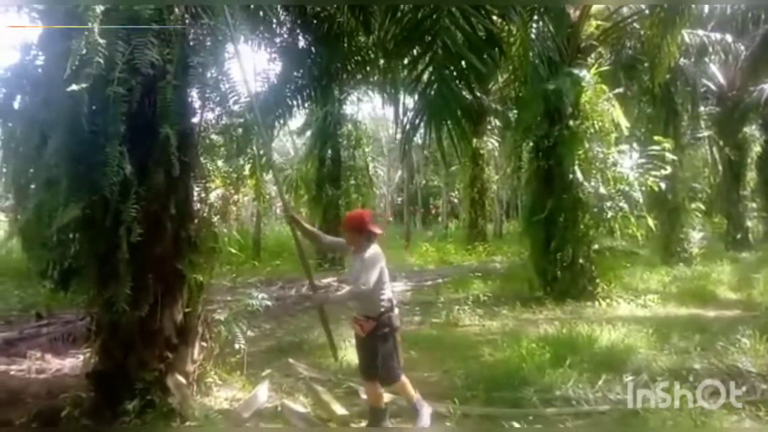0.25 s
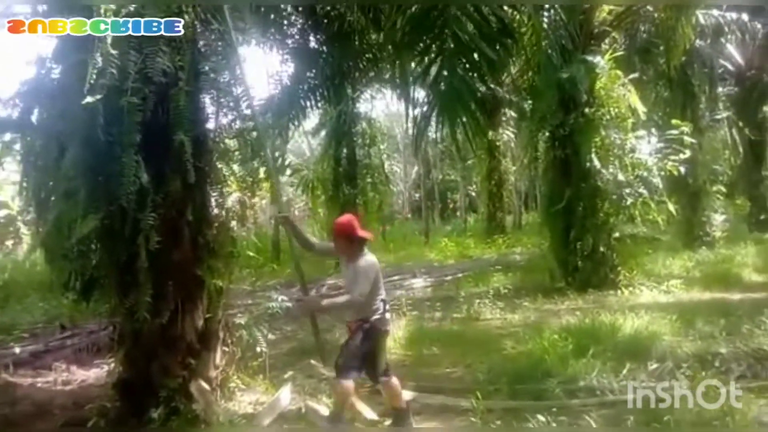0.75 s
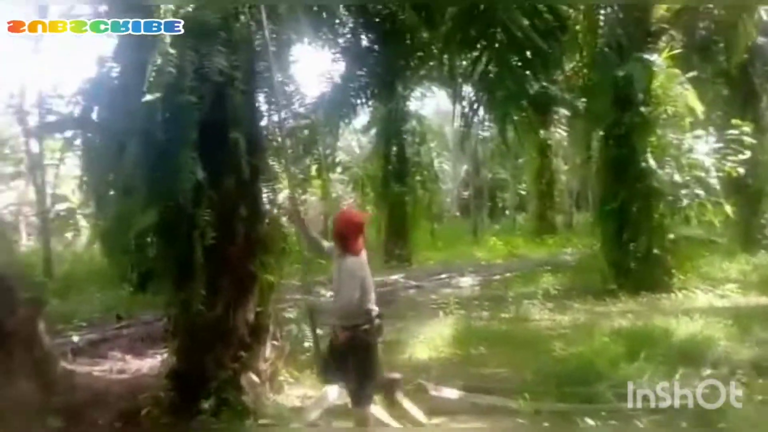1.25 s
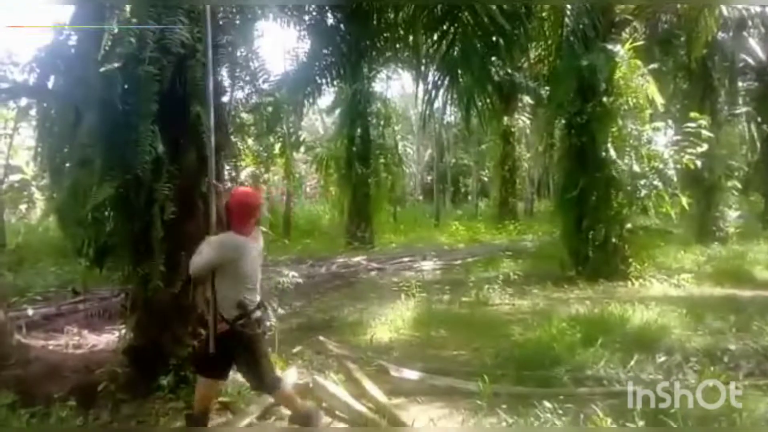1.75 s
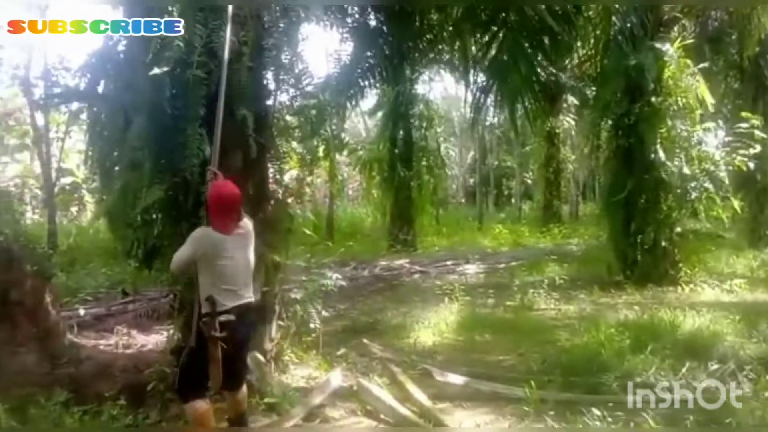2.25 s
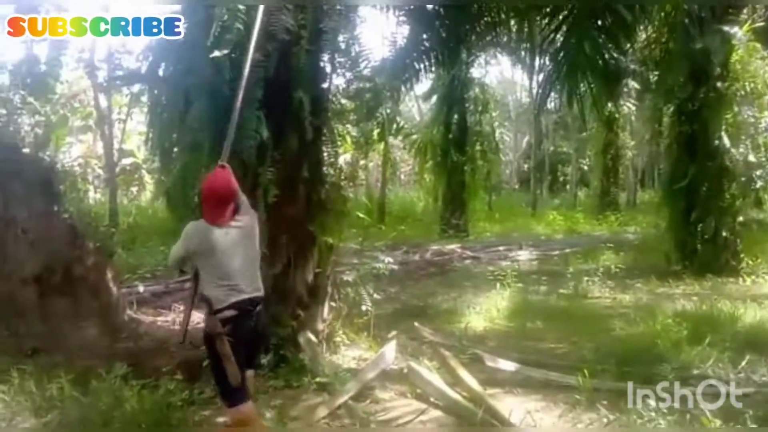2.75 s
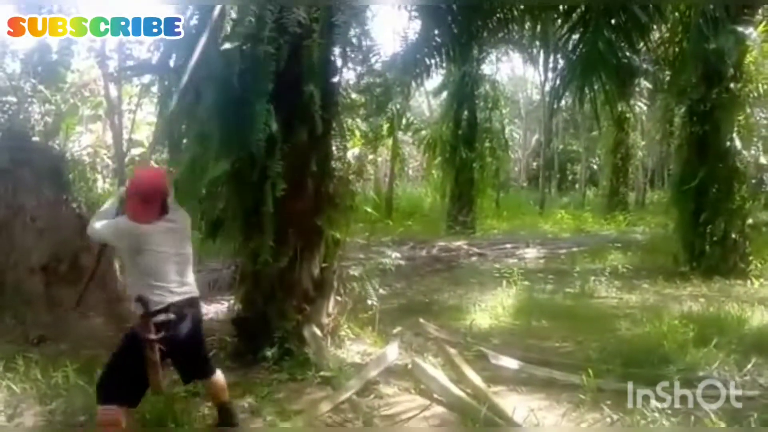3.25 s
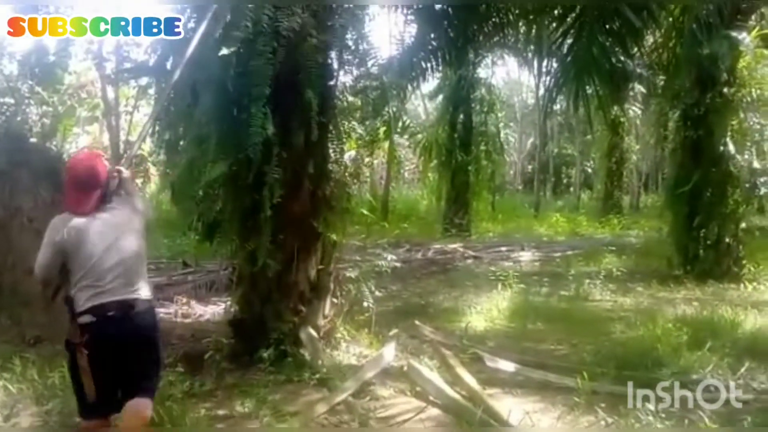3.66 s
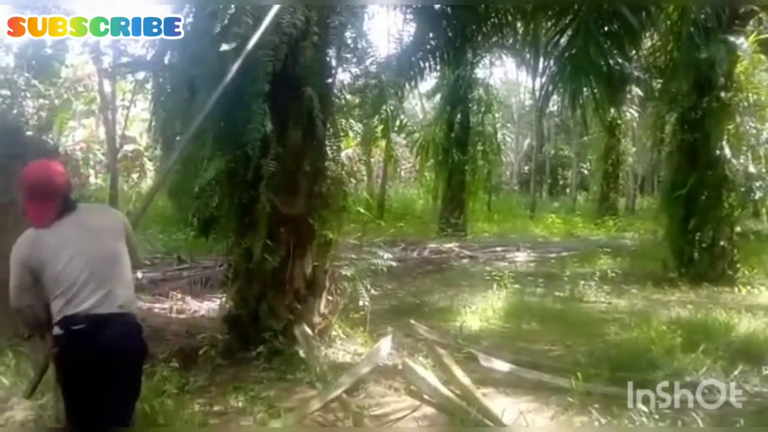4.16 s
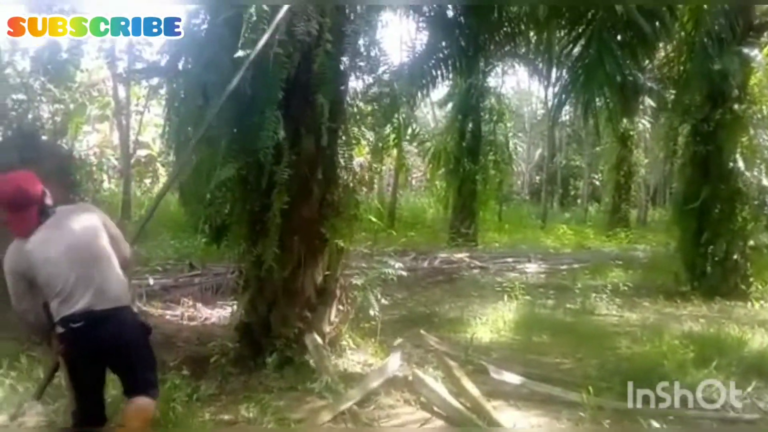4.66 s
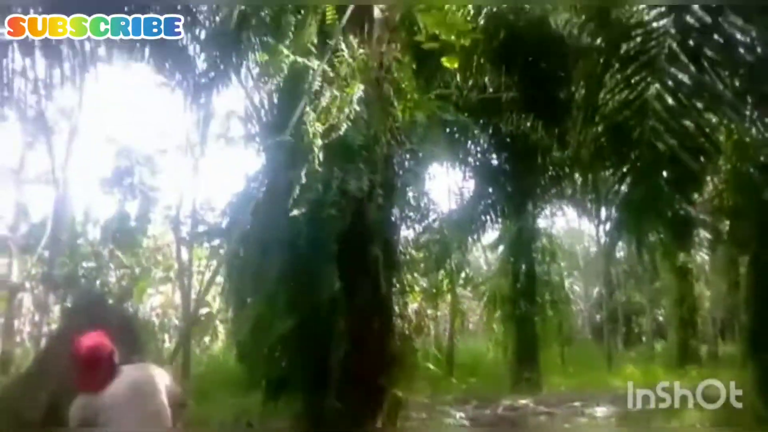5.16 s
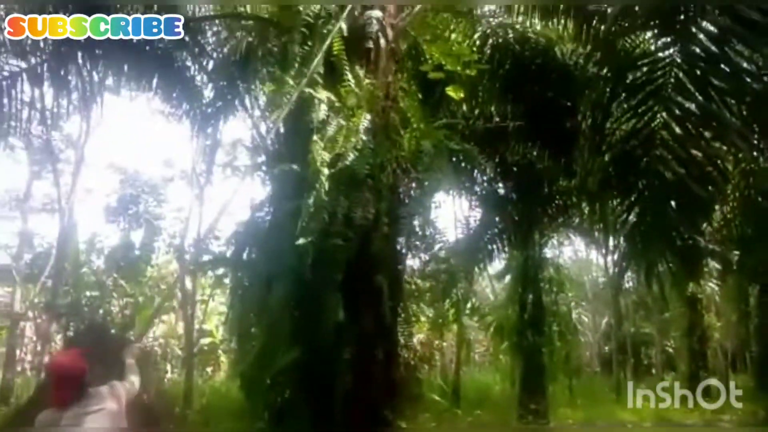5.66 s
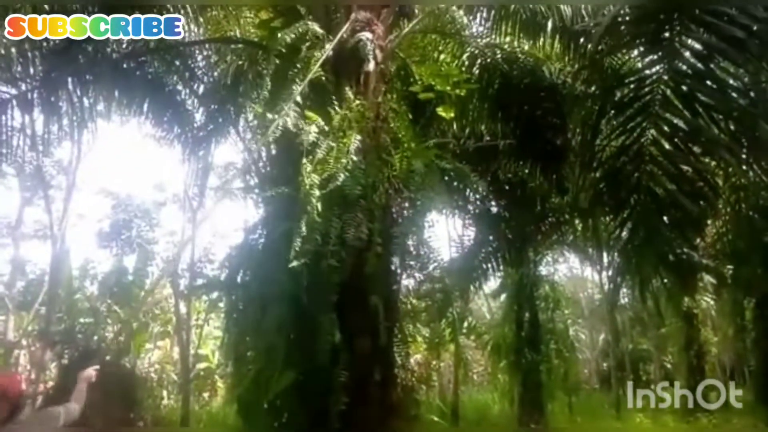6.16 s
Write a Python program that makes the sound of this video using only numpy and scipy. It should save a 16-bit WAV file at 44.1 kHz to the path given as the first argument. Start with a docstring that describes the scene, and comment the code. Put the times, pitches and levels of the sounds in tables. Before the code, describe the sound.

Hollow pole knocks and sharp cracks lead to a tearing cut, then a heavy frond clatters down amid rushing leaves, pattering bits and shrill insects.

```python
"""An oil palm plantation, heard from one point: a harvester works a sickle on a long metal pole in a crown.
Noise bursts knock along the pole and resonators ring; short bright bursts are a stalk cracking and the
hard edge of blows. Dense noise contacts rasp as the blade cuts, and looser ones, through many small
resonances, make the frond crash in a rush of leaflets; decaying tones are bits pattering from the start
of the crash and after it. Filtered noise gives the steady shrill of insects and the soft stir of air."""
import sys
import numpy as np
from scipy import signal
from scipy.fft import rfft, irfft
from scipy.io import wavfile
from scipy.ndimage import uniform_filter1d

SR = 44100
rng = np.random.default_rng(int(sys.argv[2]) if len(sys.argv) > 2 else 0)


def bounce(signal):
    """Save signal as a 16-bit WAV file at the path given by the first command-line argument."""
    frames = np.transpose(np.atleast_2d(signal))
    limited = np.clip(frames, -1, 1)
    pcm = np.round(limited * 32767).astype(np.int16)
    wavfile.write(sys.argv[1], SR, pcm)


N = 282681
TIME = np.arange(N) / SR

# Modes of the metal tube: pitch_hz, level_db, t60_s (when held loosely)
TUBE_MODES = [(459, -10.5, 0.21), (640, 0, 0.11), (677.4, 3.5, 0.21), (798, 3, 0.16), (1021, -9.5, 0.11),
              (1122, -3, 0.18), (1230, -15, 0.09), (1570, -9, 0.17), (2530, -14, 0.19)]


def from_db(db):
    """Decibels to gain."""
    return 10 ** (np.asarray(db) / 20)


def rms_one(x):
    """Scale to unit power."""
    return x / np.sqrt(np.mean(x ** 2) + 1e-20)


def drift(rate_hz):
    """Slow random wander of spread 1, joining rate_hz random points a second with straight lines."""
    points = rng.standard_normal(2000)
    return rms_one(np.interp(TIME * rate_hz, np.arange(2000), points))


def swells(rows):
    """Summed power of smooth, bell-shaped movements."""
    return sum(from_db(db) ** 2 * np.exp(-((TIME - s) / half_s) ** 2) for s, db, half_s in rows)


def colour(x, spectrum, size=4096):
    """Causal (minimum-phase) filter with the given spectrum."""
    hz, db = np.transpose(spectrum)
    grid_hz = np.maximum(np.fft.rfftfreq(size, 1 / SR), 1)
    gain = from_db(np.interp(np.log(grid_hz), np.log(hz), db))
    cepstrum = irfft(np.log(gain))
    # folding the cepstrum onto positive times puts the energy as early as possible
    fold = 1 + np.sign(size / 2 - np.arange(size))
    fold[0] = 1
    impulse = irfft(np.exp(rfft(cepstrum * fold)))
    return signal.fftconvolve(x, impulse)[:len(x)]


def ring(x, modes):
    """Resonators; a unit click at 0 dB sets each ringing with height 1."""
    out = np.zeros(N)
    for hz, db, t60 in modes:
        radius = from_db(-60 / (t60 * SR))
        angle = 2 * np.pi * hz / SR
        poles = [1, -2 * radius * np.cos(angle), radius * radius]
        out += from_db(db) * signal.lfilter([.5, 0, -.5], poles, x + 1e-18)
    return out


def resonate(x, hz, db, t60):
    """Lift a sound at a body's mode, which rings on after it."""
    quality = max(hz * t60 * np.pi / np.log(1000), 1)
    return x + from_db(db) * signal.lfilter(*signal.iirpeak(hz, quality, fs=SR), x)


def burst(t60, click, size=16384):
    """A first contact, a fast crunch and a faint aftermath."""
    t = np.arange(size) / SR
    aftermath = from_db(-17 - 60 * t / .16)
    x = rng.standard_normal(size) * (from_db(-60 * t / t60) + aftermath)
    x[0] += click
    return x


def disperse(x, travel_s):
    """Bending waves travel with the root of frequency, so a blow arrives as a quick downward chirp."""
    hz = np.fft.rfftfreq(2 * len(x), 1 / SR)
    delay_s = travel_s * np.maximum(np.sqrt(1000 / np.maximum(hz, 60)) - .8, 0)
    phase = 2 * np.pi * np.cumsum(delay_s) * hz[1]
    return irfft(rfft(x, 2 * len(x)) * np.exp(-1j * phase))[:len(x)]


def add(out, s, db, sound, size=176):
    """Mix a sound in at time s with its loudest 4 ms at db."""
    i = int(s * SR)
    peak = np.sqrt(uniform_filter1d(sound ** 2, size, mode="constant").max())
    out[i:i + len(sound)] += (sound * from_db(db) / peak)[:N - i]


def grains(per_s, spread_db, smooth):
    """Random tiny contacts of uneven size over the blur of countless smaller ones."""
    sizes = from_db(spread_db * np.minimum(rng.exponential(1, N), 4)) * rng.choice([-1, 1], N)
    contacts = rms_one(sizes * (rng.random(N) < per_s / SR))
    return rms_one(contacts + smooth * rng.standard_normal(N))


def rustle(spectrum, per_s, patchy_db, smooth, count=36, cycles=24):
    """Contacts ring many short resonances spread across the spectrum; the level of each band wanders by itself,
    so the sound is patchy."""
    contacts = [grains(per_s, spread_db=3.0, smooth=smooth) for _ in range(3)]
    out = np.zeros(N)
    for k, hz in enumerate(np.geomspace(spectrum[0][0], spectrum[-1][0], count)):
        band = rms_one(ring(contacts[k % len(contacts)], [(hz, 0, cycles / hz)]))
        # wider bands at higher pitches carry more power
        out += np.sqrt(hz) * band * from_db(patchy_db * drift(28))
    return rms_one(colour(out, spectrum))


def plantation(insect_db=-59, air_db=-75):
    """A shrill insect chorus over a soft stir of air, both as filtered noise with a slight wander in level."""
    # Spectrum of the chorus: pitch_hz, gain_db
    insect_spectrum = [(3000, -30), (4200, -29), (5100, -18), (6500, -23), (7000, -12), (7450, 0.5),
                       (7900, -6), (8600, -10.5), (9100, -31.5), (14000, -79), (15200, -27.5)]
    # Spectrum of the stirring air: pitch_hz, gain_db
    air_spectrum = [(20, -24.5), (50, 8), (100, 10), (200, 0), (330, -1), (900, -23.5), (3000, -19),
                    (9000, -97)]
    chorus = rms_one(colour(rng.standard_normal(N), insect_spectrum))
    stir = rms_one(colour(rng.standard_normal(N), air_spectrum))
    return from_db(insect_db + 0.2 * drift(30)) * chorus + from_db(air_db + 0.49 * drift(5.5)) * stir


def settle(full_s, swell_s, hold_s, settling_s, damping):
    """Motion swells by 20 dB in swell_s up to full_s, holds, then dies fast at first and ever more slowly."""
    t = TIME - full_s
    swell = from_db(20 * np.minimum(t, 0) / swell_s)
    return swell * (1 + np.maximum(t - hold_s, 0) / settling_s) ** -damping


def foliage_motion(brush_stalk_db=-10.5, bump_db=-8, bump_growth=1.38):
    """Strength of leaflets, stalks and the frond's mass; the powers of all brushes and shakes add up."""
    # The pole brushes past leaflets: middle_s, level_db (before the leaflet trim), half_length_s
    brushes = [(0.09, -59, 0.19), (0.37, -55, 0.077), (0.54, -59, 0.063), (0.86, -64.5, 0.14),
               (1.1, -63, 0.11), (1.21, -58.5, 0.062), (1.6, -70.5, 0.11), (2.19, -60.5, 0.034),
               (5.07, -57, 0.15), (5.70, -50.5, 0.038)]
    # A frond gives way, falls or lands, then settles: full_s (the motion reaches full strength, after
    # its swell), leaflet_db (before the trims), weight_db (stalks over leaflets; also steers the bumps),
    # swell_s, hold_s, settling_s
    shakes = [(1.824, -47, -2.5, 0.026, 0.0074, 0.27), (2.534, -45.5, 1.5, .1, 0.0084, 0.42),
              (3.119, -44.5, 0, 0.32, 0.035, 0.045), (3.338, -48, -3.5, 0.96, 0.049, 3),
              (3.752, -45, 4, 0.12, 0.21, 0.88), (5.777, -53.5, 2, 0.047, .11, 0.24)]
    leaf_damping, stalk_damping, mass_damping = 3.2, 6.1, 4.9  # powers: heavy parts come to rest first
    leaf = swells(brushes)
    stalk, mass = leaf * from_db(brush_stalk_db) ** 2, 0
    for full_s, db, weight, *shape in shakes:
        mass_level_db = db + bump_db + bump_growth * weight
        leaf = leaf + (from_db(db) * settle(full_s, *shape, leaf_damping)) ** 2
        stalk = stalk + (from_db(db + weight) * settle(full_s, *shape, stalk_damping)) ** 2
        mass = mass + (from_db(mass_level_db) * settle(full_s, *shape, mass_damping)) ** 2
    return np.sqrt([leaf, stalk, mass])


def foliage(leaf_db=0.56, stalk_db=-2.5, mass_db=-5.0):
    """Leaflets brush, stalks clatter, and the weight of the frond bumps along beneath."""
    # Spectra of leaflets, stalks and the frond's mass: pitch_hz, gain_db
    leaflet_spectrum = [(900, -26.5), (2000, -6.5), (3300, -1.5), (5000, 1.5), (6600, 4), (8000, -9),
                        (10000, -17.5), (13600, -35), (15000, -14.5)]
    stalk_spectrum = [(200, -13.5), (420, -2.5), (800, -0.5), (1600, -3), (2600, -8), (5000, -16)]
    mass_spectrum = [(50, -21.5), (120, -7.5), (200, -3), (420, -7.5), (800, -35), (2000, -43)]
    leaf, stalk, mass = foliage_motion()
    jerks = from_db(drift(45))
    leaves = leaf * from_db(leaf_db) * rustle(leaflet_spectrum, per_s=650, patchy_db=3.0, smooth=0.8)
    clatter = stalk * from_db(stalk_db) * rustle(stalk_spectrum, per_s=170, patchy_db=4.0, smooth=0.35)
    bumps = mass * from_db(mass_db) * rustle(mass_spectrum, per_s=140, patchy_db=4.5, smooth=0.45)
    return jerks * (leaves + clatter + bumps)


def pole_knocks(travel_s=0.00697, ring_db=2, ring_t60=0.032):
    """Hollow knocks that have run the length of the pole; each has a note, and little sound far above it."""
    # Blows that run down the pole: start_s, level_db (loudest 4 ms),
    # bass_db and treble_db (offsets that shape the spectrum), t60_s (of the crunch), pitch_hz
    blows = [(0.1, -50, -18, -4, 0.43, 1630), (0.141, -40.5, -11.5, -6, 0.066, 2100),
             (0.149, -36.5, -11.5, -8, 0.084, 1040), (0.581, -60, -25, -8, 0.19, 1530),
             (1.31, -43.5, 2, -16, 0.063, 776), (2.618, -42.5, -20, -11, 0.05, 1120),
             (2.739, -47, -6.5, -3, 0.064, 960), (3.102, -34.5, -12, -10, 0.056, 1580),
             (3.162, -36.5, -5.5, -21, 0.037, 1000), (3.279, -35.5, -11, -7.5, 0.096, 1554),
             (5.762, -32.5, -5, -11, 0.11, 1214), (5.848, -35.5, -14, -24, .055, 1410),
             (5.869, -39, -18, -6.5, 0.09, 1270), (5.951, -40.5, -2, -15, 0.089, 1160),
             (6.061, -49, -12, -9, 0.11, 1240)]
    out = np.zeros(N)
    for s, db, bass, treble, t60, hz in blows:
        low = [(70, bass - 18), (170, bass - 3), (230, bass + 8), (480, bass), (780, 0.0)]
        high = [(1.6 * hz, -4), (2.24 * hz, treble - 8), (6500, treble - 8), (9000, treble - 30)]
        struck = colour(burst(t60, click=4.2), sorted(low + high))
        blow = resonate(struck, hz, ring_db, ring_t60)
        add(out, s, db, disperse(blow, travel_s))
    return out


def pole_ring(grip_db_per_octave=35, rise_s=0.0012):
    """Hard blows leave the tube and the blade ringing; a firm grip damps the tube, its high modes most."""
    # Blows that set the pole ringing: start_s, tube_db, blade_db (both added to the mode levels),
    # freedom (factor on the tube's t60)
    hits = [(0.101, -65, -51.5, .9), (0.151, -49, -75, .7), (0.582, -57, -78, .6), (0.967, -50, -90, 0.25),
            (1.317, -60, -77, .5), (3.765, -46, -47.5, 0.82), (3.916, -39, -69, 0.47),
            (3.999, -34.5, -46, 1), (5.040, -60, -66, 0.76), (5.767, -42.5, -46, 0.83)]
    # Modes of the sickle blade: pitch_hz, level_db, t60_s
    blade_modes = [(5440, -5, 0.36), (5700, 4.5, 0.13), (6940, -11, 0.28)]
    out, blade = np.zeros((2, N))
    t = np.arange(SR // 2) / SR
    for s, tube_db, blade_db, freedom in hits:
        i = int(s * SR)
        dull = grip_db_per_octave * max(1 - freedom, 0)
        tube = np.zeros(len(t))
        for k, (hz, db, t60) in enumerate(TUBE_MODES):
            octaves_up = max(np.log2(hz / 800), 0)
            level = from_db(db - dull * octaves_up - 60 * t / (t60 * freedom))
            tube += (-1) ** k * np.sin(2 * np.pi * hz * t) * level
        out[i:i + len(t)] += from_db(tube_db) * (tube * np.minimum(t / rise_s, 1))[:N - i]
        blade[i] = from_db(blade_db)
    return out + ring(blade, blade_modes)


def pole_slides():
    """The pole rubs along stalk stubs, and the friction makes the tube sing faintly."""
    # Slides along the stubs: middle_s, level_db, half_length_s
    slides = [(0.125, -53, 0.014), (0.3, -64.5, 0.043), (2.97, -56.5, 0.053)]
    friction = grains(400, spread_db=3.0, smooth=0.45)
    return np.sqrt(swells(slides)) * rms_one(ring(friction, TUBE_MODES))


def pole_bending(bending_hz=225, bending_t60_s=0.053):
    """A soft jolt sets only the lowest mode of the pole going: a short, dull hum."""
    # Soft jolts through the hands: start_s, level_db (loudest 4 ms), push_s
    jolts = [(0.145, -52.5, 0.024), (0.208, -55.5, 0.017), (0.415, -58.5, 0.05), (0.966, -50.5, 0.0064),
             (1.312, -58, 0.017), (5.77, -51, 0.01)]
    out, t = np.zeros(N), np.arange(8192) / SR
    for s, db, push_s in jolts:
        decay = from_db(-60 * np.maximum(t - push_s, 0) / bending_t60_s)
        envelope = np.minimum(t / push_s, 1) * decay
        add(out, s, db, envelope * np.sin(2 * np.pi * bending_hz * t))
    return out


def cracks(t60=0.0092, ring_hz=2150, ring_db=4, ring_t60=0.058):
    """Sharp bright contacts with a brief ring: snaps, and the hard edge of knocks and stalk blows."""
    # Snaps and hard edges: start_s, level_db (loudest 4 ms), body_db (offset of the low spectrum)
    contacts = [(0.337, -48.5, -18), (1.275, -41.5, -19), (1.3176, -38.5, 5.5), (1.7882, -44, -32),
                (1.7945, -33, -36), (1.798, -39, -26), (1.8104, -32, -27), (1.8201, -29, -13),
                (1.8488, -37, -9), (3.102, -34.5, -10), (3.28, -38, -2), (3.996, -31, 3.5), (4.088, -42, 2),
                (4.237, -38, -9), (4.426, -36.5, 1.5), (4.574, -42, 2.5), (4.846, -47.5, -6),
                (5.014, -45.5, -17), (5.040, -42.5, 3), (5.375, -54, -9), (5.870, -33.5, -15)]
    # Upper spectrum of a contact: pitch_hz, gain_db
    bright_spectrum = [(1900, 0), (3500, -8), (5000, -2), (6800, 0), (8200, -16.5), (13500, -31),
                       (15000, -15.5)]
    out = np.zeros(N)
    for s, db, body in contacts:
        spectrum = [(60, body - 14), (220, body + 4), (1100, body)] + list(bright_spectrum)
        contact = colour(burst(t60, click=2.5), spectrum)
        add(out, s, db, resonate(contact, ring_hz, ring_db, ring_t60))
    return out


def handling(hz=95, swing_db=3):
    """Soft, uneven low bumps from the moving microphone: noise through one low resonance."""
    # The microphone is carried along: middle_s, level_db (before the uneven swing), half_length_s
    carries = [(2.1, -72.5, 0.15), (2.9, -66.5, 0.46), (6.0, -68.5, 0.24)]
    level = np.sqrt(swells(carries)) * from_db(swing_db * drift(10))
    return level * rms_one(ring(rng.standard_normal(N), [(hz, 0, .07)]))


def cut(start_s=2.3793, build_s=0.14, hold_s=0.032, t60_s=0.12, pull_db=-34, curve=1.3):
    """The blade tears through thousands of fibres in one pull, which builds, holds and lets go."""
    # Spectrum of the rasping blade: pitch_hz, gain_db
    rasp_spectrum = [(60, -24), (170, -6), (280, -10), (370, 7), (560, 5.5), (800, -4.5), (1150, 0.5),
                     (2600, 1.5), (4000, -1.5), (6600, 1.5), (8000, -15.5), (13500, -30.5), (15000, -21)]
    t = TIME - start_s
    release = from_db(-60 * np.maximum(t - build_s - hold_s, 0) / t60_s)
    force = from_db(pull_db) * np.clip(t / build_s, 0, 1) ** curve * release
    return force * rustle(rasp_spectrum, per_s=6500, patchy_db=1.8, smooth=0.74)


def thuds(t60=0.023, travel_s=0.00199, ring_db=2, ring_t60=0.03, bass_db_per_octave=9):
    """Short woody impacts, each with the brief note of its stalk; heavy stalks are lower and duller."""
    # Stalks striking each other and the ground: start_s, level_db (loudest 4 ms), pitch_hz
    impacts = [(2.892, -41, 336), (3.199, -43.5, 900), (3.567, -41.5, 1540), (3.635, -35.5, 950),
               (3.686, -45, 450), (3.717, -34.5, 890), (3.743, -34.5, 1090), (3.761, -34, 700),
               (3.767, -36.5, 1420), (3.781, -34, 790), (3.8125, -30, 800), (3.826, -31.5, 1200),
               (3.8335, -28.5, 850), (3.889, -42, 990), (3.909, -41, 277), (3.916, -35, 560),
               (3.938, -34, 740), (4.047, -46, 330), (4.156, -42.5, 680), (4.193, -41.5, 350),
               (4.219, -38.5, 690), (4.261, -34, 1000), (4.335, -40.5, 1170), (4.426, -34.5, 1440),
               (4.478, -47, 450), (4.573, -45.5, 850), (4.752, -44.5, 1430)]
    out = np.zeros(N)
    for s, db, hz in impacts:
        heavy = np.log2(750 / hz)  # octaves below a middling stalk
        bass = bass_db_per_octave * min(heavy, .5)
        low = [(70, bass - 22), (230, bass + 5), (hz, 0)]
        high = [(2.4 * hz, -3), (2.54 * hz, -11), (6500, -16 - 6 * heavy), (9000, -32)]
        struck = colour(burst(t60, click=3.6), sorted(low + high))
        blow = resonate(struck, hz, ring_db, ring_t60)
        add(out, s, db, disperse(blow, travel_s))
    return out


def patter(count=3, start_s=3.65, per_s=24, length_s=1.85):
    """From the start of the crash, bits tap at random, ever more weakly; each rings at a few own pitches."""
    first_db, fade_db_per_s, spread_db = -42, 16.5, 9
    low_hz, high_hz, cycles = 694, 1964, 51  # each pitch falls 60 dB in this many cycles
    out, t = np.zeros(N), np.arange(4096) / SR
    for when, size, *pitches in rng.random((int(per_s * length_s), 2 + count)):
        age = when * length_s
        modes_hz = low_hz * (high_hz / low_hz) ** np.array(pitches)
        tap = sum(np.sin(2 * np.pi * hz * t) * from_db(-60 * t * hz / cycles) for hz in modes_hz)
        level_db = first_db - fade_db_per_s * age + spread_db * (2 * size - 1)
        add(out, start_s + age, level_db, tap)
    return out


def grove(x, t60=0.27, wet_db=-18, count=60):
    """Weak echoes, thin in the bass, scatter back from the trunks."""
    delays_s = rng.uniform(0.0075, 0.22, count)
    echoes = np.zeros(SR)
    echoes[(delays_s * SR).astype(int)] = rng.standard_normal(count) * from_db(-60 * delays_s / t60)
    wet = signal.fftconvolve(x, echoes / np.linalg.norm(echoes))[:N]
    return x + from_db(wet_db) * colour(wet, [(100, -5.5), (1500, 11.0), (8000, 10.5)])


def scene():
    """All is heard from one point, alike in both ears; only the work of pole, blade and stalks echoes."""
    pole = pole_knocks() + pole_ring() + pole_slides() + pole_bending()
    work = pole + cracks() + cut() + thuds() + patter()
    mono = grove(work) + foliage() + plantation() + handling()
    return np.tile(mono, (2, 1))


def record(dry):
    """A small microphone loses the deep bass; the top is cut steeply."""
    bass_cut = signal.butter(2, 35, "high", fs=SR, output="sos")
    top_cut = signal.ellip(10, .1, 80, 15900, fs=SR, output="sos")
    return signal.sosfilt(top_cut, signal.sosfilt(bass_cut, dry))


dry = scene()
out = record(dry)
bounce(out)
```